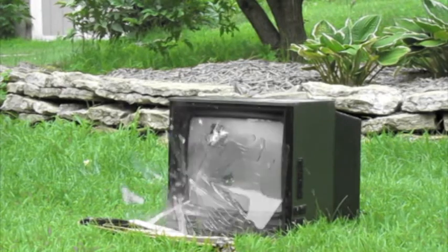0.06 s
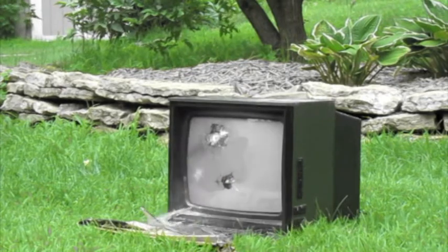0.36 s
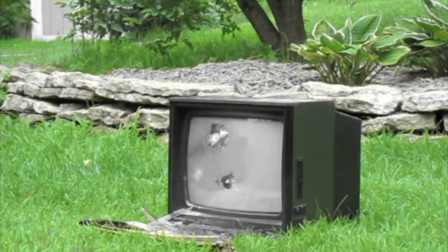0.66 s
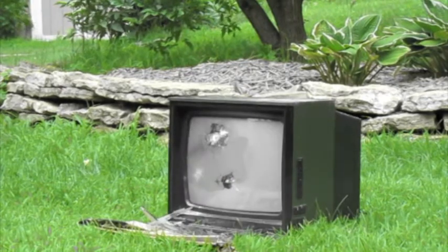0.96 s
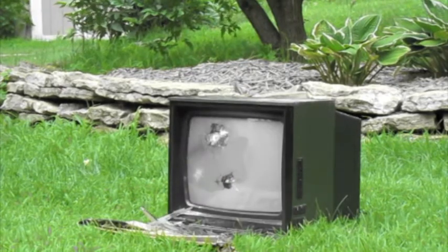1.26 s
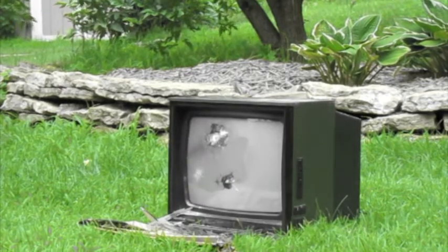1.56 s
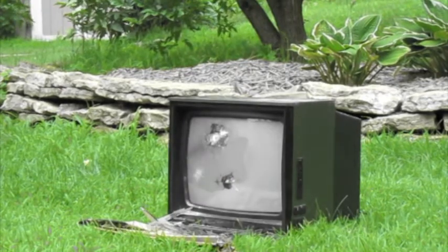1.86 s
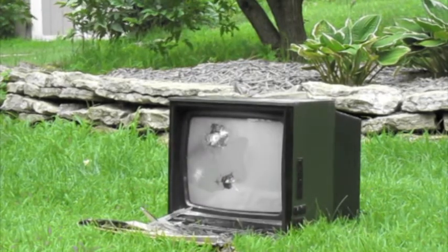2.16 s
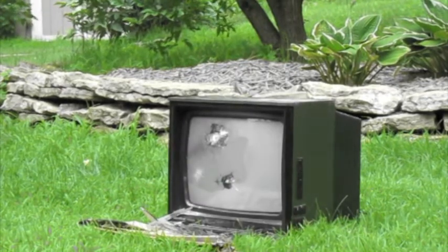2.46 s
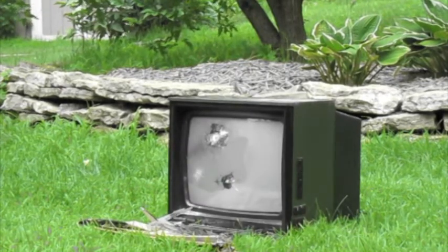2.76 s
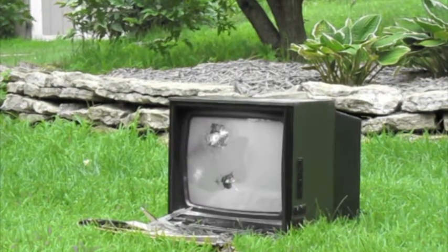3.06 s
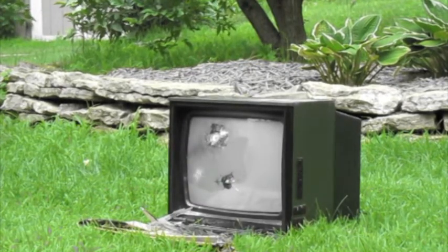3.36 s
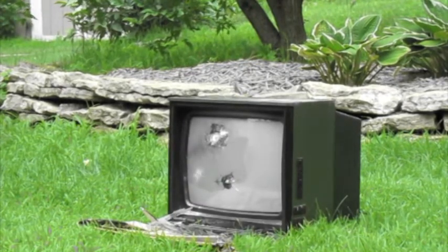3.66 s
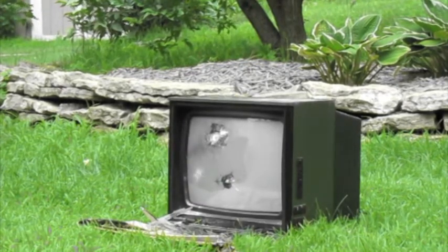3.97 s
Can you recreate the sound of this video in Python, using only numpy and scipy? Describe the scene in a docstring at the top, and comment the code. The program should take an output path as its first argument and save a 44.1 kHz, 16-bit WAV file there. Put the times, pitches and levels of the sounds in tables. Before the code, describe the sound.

A television's glass front crashes down in tinkling shards, followed by low, buffeting wind.

```python
"""Television glass shattering on a lawn

The glass front of an old television breaks up: splinters crackle, the sheet crashes down in a shower
of ringing shards, and the last pieces tinkle to rest. Then the background comes up in level: trees
rustle and wind buffets the microphone, while a far bird gives a thin whistle and a chirp."""
import sys
import numpy as np
from scipy import signal
from scipy.fft import rfft, irfft
from scipy.io import wavfile
from scipy.ndimage import uniform_filter1d

SR = 44100
rng = np.random.default_rng(int(sys.argv[2]) if len(sys.argv) > 2 else 0)


def generate_wav(signal):
    """Clip the signal to [-1, 1] and save it as 16-bit WAV at the path in sys.argv[1]."""
    frames = np.transpose(np.atleast_2d(signal))
    scaled = np.clip(frames, -1, 1) * 32767
    pcm = np.round(scaled).astype(np.int16)
    wavfile.write(sys.argv[1], SR, pcm)


N = 176400

# tone of the rustling trees (frequency [Hz], gain [dB])
TREE_EQ = [(100, 11), (450, -2.5), (750, 1), (1400, 1), (2200, -4.5), (3200, -12.5), (5000, -20),
           (8000, -22.5), (11000, -27.5), (15500, -38.5)]
# gain ride on trees and leaves (time [s], gain [dB])
FOLIAGE_RIDE = [(0, -22), (.55, -12.5), (.8, -8.5), (1.3, -1), (2.7, 0.4), (3.3, 2.5), (4, -1)]
# nearby leaves swishing (time [s], level before the ride [dB], half length [s])
LEAF_SWISHES = [(2.918, -65, 0.041), (3.45, -66, .05)]
# bird whistle (time [s], pitch [Hz], level [dB])
WHISTLE = [(2.08, 5230, -85), (2.17, 5240, -66), (2.245, 5210, -76), (2.28, 5240, -68), (2.43, 5310, -75)]
# wind on the microphone (time [s], rumble level [dB], flutter level [dB])
WIND_LEVELS = [(0, -44.5, -64), (.55, -41.5, -58), (.76, -26.5, -47), (.84, -36, -52), (1.27, -28.5, -46),
               (1.33, -23, -44), (2.0, -22.5, -35.5), (2.25, -22, -46), (2.6, -23, -32.5),
               (2.76, -25, -42.5), (3.05, -20, -40), (3.3, -19.5, -41), (3.48, -24, -38),
               (3.72, -23.5, -45), (3.88, -27.5, -46.5), (4, -27, -40.5)]
# tone of the wind's deep rumble (frequency [Hz], gain [dB])
RUMBLE_EQ = [(10, -3.5), (28, -0.5), (55, -5), (100, -10), (160, -18), (250, -33), (500, -52.5),
             (2000, -100)]
# tone of the wind's flutter (frequency [Hz], gain [dB])
FLUTTER_EQ = [(80, -9.5), (140, -7.5), (220, -0.5), (330, -7.5), (500, -19), (900, -38), (2000, -66)]
# eddies hitting the microphone (time [s], level [dB], upper edge [Hz])
EDDY_HITS = [(0.735, -30, 252), (0.879, -28.5, 220), (1.291, -26.5, 217), (1.482, -22, 260),
             (1.607, -21, 221), (1.67, -22.5, 302), (1.71, -26, 238), (1.843, -18, 294), (1.871, -16, 172),
             (1.905, -25, 326), (1.972, -17.5, 345), (2.049, -18, 212), (2.073, -25, 413),
             (2.168, -23.5, 308), (2.282, -17.5, 305), (2.344, -18, 150), (2.452, -23.5, 288),
             (2.545, -21.5, 263), (2.578, -14.5, 186), (2.63, -23.5, 221), (2.693, -22.5, 240),
             (2.912, -22, 233), (3.074, -19, 176), (3.149, -18, 185), (3.344, -11.5, 125),
             (3.515, -19.5, 322), (3.589, -13, 127), (3.64, -17.5, 245), (3.665, -12.5, 159),
             (3.794, -16.5, 133)]
# deep surges of pressure (time [s], level [dB], pitch [Hz], half length [s])
SUB_SURGES = [(3.377, -6, 41.53, 0.0064), (3.416, -16, 27.32, 0.025), (3.7, -15.5, 28.09, 0.032)]
# tone of the glass (frequency [Hz], gain [dB])
GLASS_EQ = [(200, -23), (500, -13), (1000, -29), (2000, -10), (2900, -7.5), (5500, -4), (8500, 1.5),
            (11000, -2), (13500, 1), (15500, -13)]
# single shards clinking out of the shower (time [s], level [dB], main pitch [Hz])
SHARD_CLINKS = [(0.172, -29, 2936), (0.193, -32, 12200), (0.318, -32, 8000), (.365, -32.5, 7840),
                (0.405, -30.5, 12300), (0.423, -35, 14100), (0.4507, -55, 7800), (0.4798, -40.5, 8240),
                (0.502, -45, 7740), (.5211, -44, 12400), (.5415, -58, 9200), (0.56, -50, 9200),
                (.606, -56, 9570)]
# dry ticks of settling pieces (time [s], level [dB], centre [Hz])
SETTLING_TICKS = [(.687, -52, 8800), (.872, -61.5, 8900), (1.207, -44.5, 3840)]
# ring of the large pieces (frequency [Hz], relative level [dB])
PLATE_MODES = [(2795, -4), (2929, -9), (6700, 3.5), (7564, -13), (8515, 5.5), (9045, -1), (10180, 0),
               (12300, 1.5), (13400, -1.5), (14078, 1.5)]
# envelope of the falling glass (time [s], level [dB])
SHOWER_LEVEL = [(0, -39), (.138, -44.5), (.168, -27.5), (.29, -27.5), (.335, -24.5), (.375, -30.5),
                (.45, -46), (.52, -54), (.6, -62.5), (.72, -74)]
# big pieces striking (time [s], level [dB])
CRASH_HITS = [(.11, -33.5), (0.151, -33), (0.1655, -18), (0.2129, -18.5), (.236, -30), (0.267, -25),
              (0.291, -31), (0.338, -21)]

TOP_HZ = 15750
CABINET_HZ, CABINET_WIDTH_HZ = 744, 1400


def undb(db):
    """Decibels to gain."""
    return 10 ** (np.asarray(db) / 20)


def clock():
    """Time of every sample."""
    return np.arange(N) / SR


def curve(table, column=1):
    """One column of a table, joined by straight lines in time."""
    rows = np.array(table)
    return np.interp(clock(), rows[:, 0], rows[:, column])


def swell(at, half_s):
    """Bell-shaped envelope around a time."""
    return np.exp(-.5 * ((clock() - at) / half_s) ** 2)


def unit(x):
    """Scale to rms 1."""
    return x / np.sqrt(np.mean(x ** 2) + 1e-18)


def colour(x, points):
    """EQ by (frequency [Hz], gain [dB]) points, rolling off below the first."""
    hz, db = np.array(points).T
    f = np.maximum(np.fft.rfftfreq(len(x), 1 / SR), 1)
    gain = undb(np.interp(np.log(f), np.log(hz), db)) * np.minimum(f / hz[0], 1)
    return irfft(rfft(x) * gain, len(x))


def noise(points):
    """Coloured noise of rms 1."""
    return unit(colour(rng.standard_normal(N), points))


def tone(hz):
    """Sine following a pitch curve."""
    return np.sin(2 * np.pi * np.cumsum(hz) / SR)


def band(x, hz, width_hz):
    """One broad resonance."""
    return signal.lfilter(*signal.iirpeak(min(hz, SR * .45), hz / width_hz, fs=SR), x)


def walk(rate):
    """Random wander of rms 1, taking `rate` steps a second."""
    hold = int(SR / rate)
    steps = np.repeat(rng.standard_normal(N // hold + 1), hold)
    return unit(uniform_filter1d(steps, hold)[:N])


def steady(x, span_s):
    """Even out level swings slower than the span."""
    return x / np.sqrt(np.abs(uniform_filter1d(x ** 2, int(span_s * SR))) + 1e-9)


def burst(x, shape):
    """The sound under an envelope, at rms 1 where the envelope is 1."""
    return x * shape / np.sqrt(np.sum((x * shape) ** 2) / np.sum(shape ** 2))


def add(out, at, x):
    """Mix a sound in at a time."""
    i = max(int(at * SR), 0)
    out[i:i + len(x)] += x[:max(len(out) - i, 0)]


def ring(hz, t60, size=6000):
    """One struck mode."""
    t = np.arange(size) / SR
    return np.sin(2 * np.pi * hz * t) * np.exp(-np.log(1000) * t / t60)


def contacts(rate, spread_db):
    """Random clicks of uneven size, about `rate` a second."""
    hits = rng.random(N) < rate / SR
    return hits * undb(spread_db * rng.standard_normal(N)) * rng.choice([-1, 1], N)


def garden(hum_hz=415):
    """The bed: trees rustle all round, nearer leaves swish, something hums far off."""
    trees = undb(-46.5) * noise(TREE_EQ) * undb(.5 * walk(12))
    hiss = unit(band(rng.standard_normal(N), 8000, 6000))
    leaves = hiss * sum(undb(db) * swell(at, half) for at, db, half in LEAF_SWISHES)
    hum = undb(-65) * tone(hum_hz * (1 + .0064 * walk(15)))
    return (trees + leaves) * undb(curve(FOLIAGE_RIDE)) + hum


def bird(chirp_hz=3600):
    """One thin, wavering whistle from the trees, then a lower chirp."""
    t = clock()
    pitch = curve(WHISTLE) * (1 + .0076 * walk(150))
    gate = uniform_filter1d(1. * ((t > WHISTLE[0][0]) & (t < WHISTLE[-1][0])), size=400)
    whistle = tone(pitch) * gate * undb(curve(WHISTLE, column=2) + 2 * walk(66))
    chirp = tone(chirp_hz * (1 + .011 * walk(150))) * undb(-62) * swell(at=2.477, half_s=.016)
    return np.sqrt(2) * (whistle + chirp)


def wind(eddy_half_s=.0093, low_cut_hz=40.3, edge_db=-16.5, size=4096):
    """Rumble, flutter and deep surges on the microphone; each eddy is a pressure dip in a flurry."""
    rumble = steady(noise(RUMBLE_EQ) * undb(2 * walk(25)), .098)
    flutter = steady(noise(FLUTTER_EQ) * undb(2.7 * walk(50)), .2)
    out = rumble * undb(curve(WIND_LEVELS)) + flutter * undb(curve(WIND_LEVELS, column=2))
    age, f = (np.arange(size) - size // 2) / SR, np.fft.rfftfreq(size, 1 / SR)
    shape = np.exp(-.5 * (age / eddy_half_s) ** 2)
    energy = np.sum(shape ** 2)
    dip = -1. * (age == 0)
    for at, db, edge_hz in EDDY_HITS:
        flurry = undb(-3.5) * rng.standard_normal(size) * shape / np.sqrt(energy)
        softening = f / np.hypot(f, low_cut_hz) * undb(edge_db * (f / edge_hz) ** 1.187)
        flap = irfft(rfft(dip + flurry) * softening)
        add(out, at + age[0], undb(db) * flap * np.sqrt(energy / np.sum(flap ** 2)))
    for at, db, hz, half in SUB_SURGES:
        heave = np.sqrt(2) * np.sin(2 * np.pi * (hz * clock() + rng.random()))
        out += undb(db) * swell(at, half) * heave
    return out


def splinters(hz=2600, width_hz=3200, fade_db_per_s=53.5, end_s=.23):
    """Cracks run through the sheet and die away."""
    t = clock()
    cracks = band(band(contacts(2700, 4.8), hz, width_hz), hz, width_hz)
    return steady(cracks, .049) * undb(-46.5 - fade_db_per_s * t) * (t < end_s)


def cabinet_rattle(start_s=.13, end_s=.35):
    """The falling glass drums on the cabinet's broad resonance."""
    t = clock()
    gate = uniform_filter1d(1. * ((t > start_s) & (t < end_s)), size=600)
    rattle = band(contacts(900, 2.7), CABINET_HZ, CABINET_WIDTH_HZ)
    return undb(-50) * steady(rattle, .078) * gate


def stragglers(clink_t60_s=.062, tick_decay_s=.0025, size=3000):
    """Single shards clink, their side modes dying first; the very last only tick."""
    out, t = np.zeros(N), np.arange(size) / SR
    for at, db, hz in SHARD_CLINKS:
        side_modes = sum(ring(f, clink_t60_s / 2) for f in rng.uniform(6600, TOP_HZ, 10))
        add(out, at, undb(db) * (ring(hz, clink_t60_s) + undb(-11) * side_modes))
    for at, db, hz in SETTLING_TICKS:
        tick = band(band(rng.standard_normal(size), hz, .63 * hz), hz, 2 * hz)
        add(out, at, undb(db) * burst(tick, np.exp(-t / tick_decay_s)))
    return out


def shards(count=380, lowest_hz=2585, mid_t60_s=.052, mean_bounce_s=.014, bounce_db=-9.5):
    """Shards of three modes each land over one second and bounce twice, softer each time."""
    out = np.zeros(N)
    for when, length, strength, gap, *offsets in rng.random((count, 7)):
        # one mode in each third of the range
        pitches = lowest_hz + (TOP_HZ - lowest_hz) * (np.array(offsets) + np.arange(3)) / 3
        clink = sum(ring(hz, mid_t60_s * 2 ** (2 * length - 1)) for hz in pitches)
        for bounce in range(3):
            at = when - mean_bounce_s + bounce * mean_bounce_s * (.5 + gap)
            add(out, at, undb(7 * strength ** 2 + bounce * bounce_db) * clink)
    return colour(out, GLASS_EQ)


def large_pieces(detune=.0033, t60_s=.11):
    """Each mode is shared by three pieces of nearly the same size, struck at random."""
    out = np.zeros(N)
    for hz, db in PLATE_MODES:
        trio = np.zeros(N)
        for _ in range(3):
            strikes = contacts(70, 2)
            mode = ring(hz * (1 + detune * rng.standard_normal()), t60_s)
            trio += signal.oaconvolve(strikes, mode)[:N]
        out += undb(db) * unit(trio) * undb(2 * np.clip(walk(30), -2, 1))
    return out


def shower(small_pieces_s=.37, thin_below_hz=5000, tail_decay_s=.067):
    """Glass rings over crunching splinters; small pieces fall last, muffled by the heap."""
    t = clock()
    ringing = undb(-2.5) * steady(shards(), .071)
    crunch = undb(-3.5) * steady(colour(contacts(2500, 2.5), GLASS_EQ), .013)
    ringing += undb(-5) * steady(large_pieces(), .02)
    muffled = np.clip((t - small_pieces_s) / .1, 0, 1)
    glass = ringing * (1 - muffled / 2) + crunch * (1 + muffled / 2)
    # small pieces have a touch less body
    body = signal.sosfiltfilt(signal.butter(2, thin_below_hz, fs=SR, output="sos"), glass)
    thinning = np.clip((t - small_pieces_s) / .034 + .5, 0, 1)
    glass += (undb(-.5) - 1) * body * thinning
    tail = np.exp(-np.maximum(t - SHOWER_LEVEL[-1][0], 0) / tail_decay_s)
    return glass * undb(curve(SHOWER_LEVEL)) * tail


def crashes(decay_s=.0054, knock_db=-20.5, shelf_db=-1.5, size=4000):
    """Each big piece lands with a bright splintering crack and knocks on the cabinet."""
    out, t = np.zeros(N), np.arange(size) / SR
    for at, db in CRASH_HITS:
        glassy = colour(rng.standard_normal(size), GLASS_EQ)
        crack = unit(colour(glassy, [(300, shelf_db), (5000, shelf_db), (8000, 0)]))
        knock = unit(band(rng.standard_normal(size), CABINET_HZ, CABINET_WIDTH_HZ))
        add(out, at, undb(db) * burst(crack + undb(knock_db) * knock, np.exp(-t / decay_s)))
    return out


def scene():
    """Glass, garden, wind and bird, mixed in mono."""
    glass = splinters() + cabinet_rattle() + shower() + crashes() + stragglers()
    return (glass + garden() + wind() + bird())[None]


def record(dry):
    """A steep low-pass trims the very top."""
    return signal.sosfilt(signal.ellip(10, .2, 80, TOP_HZ, fs=SR, output="sos"), dry)


dry = scene()
out = record(dry)
generate_wav(out)
```